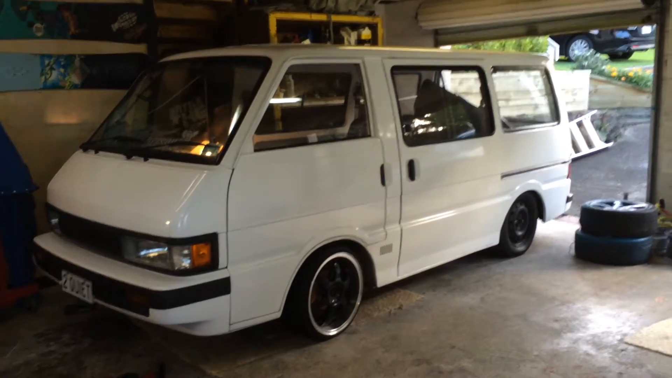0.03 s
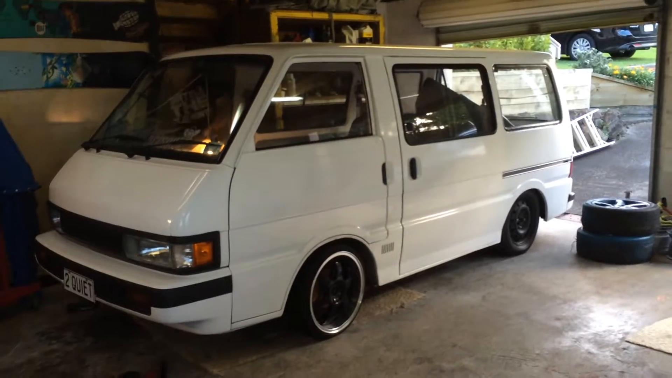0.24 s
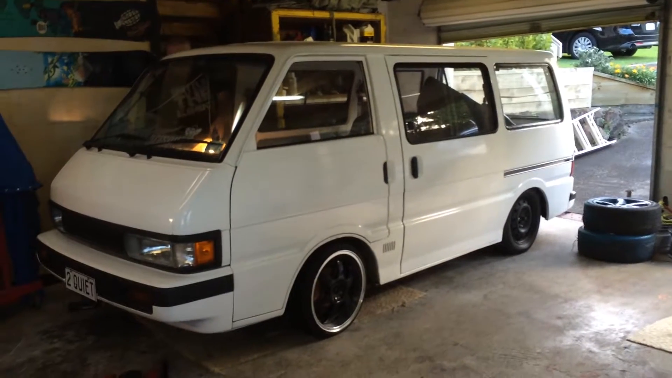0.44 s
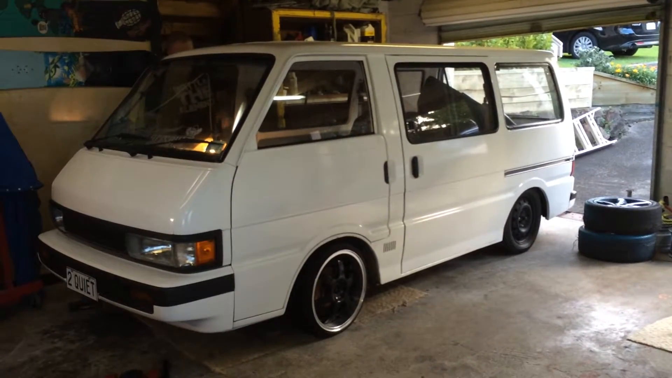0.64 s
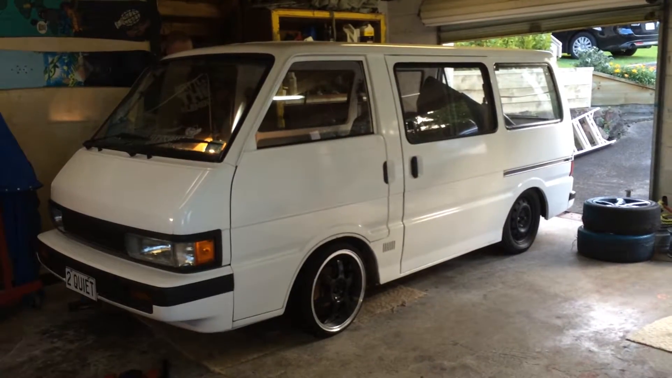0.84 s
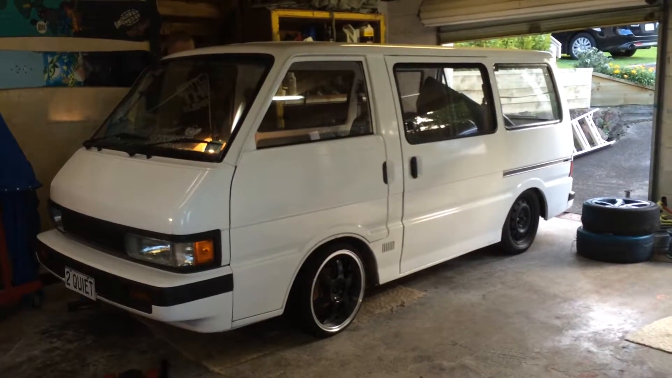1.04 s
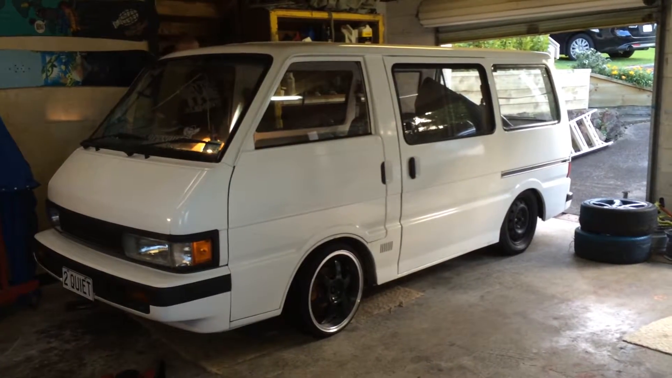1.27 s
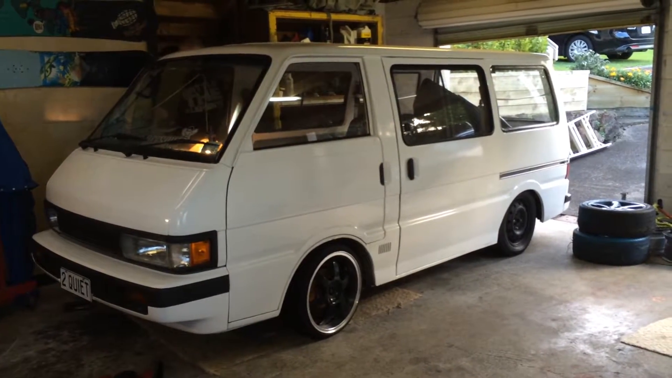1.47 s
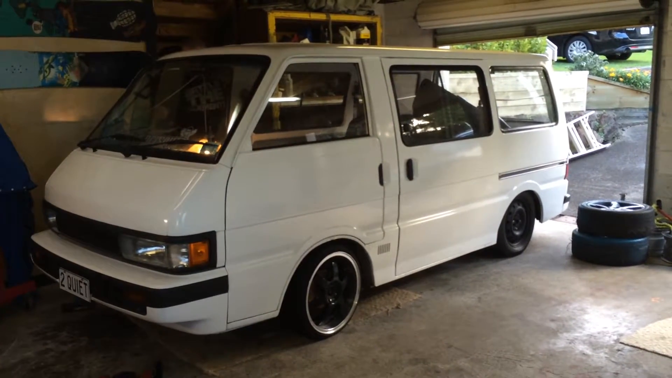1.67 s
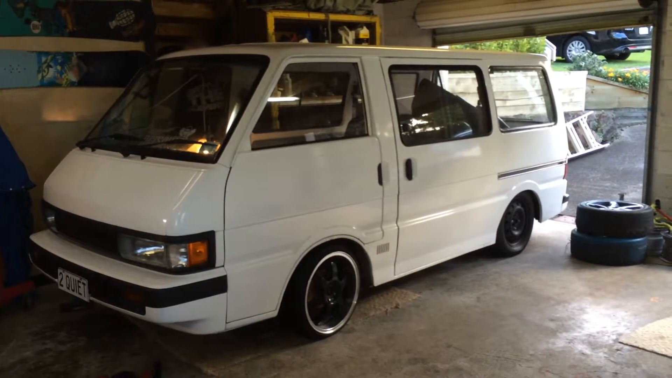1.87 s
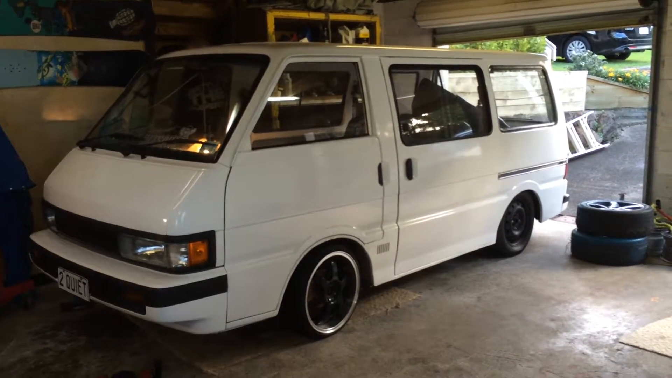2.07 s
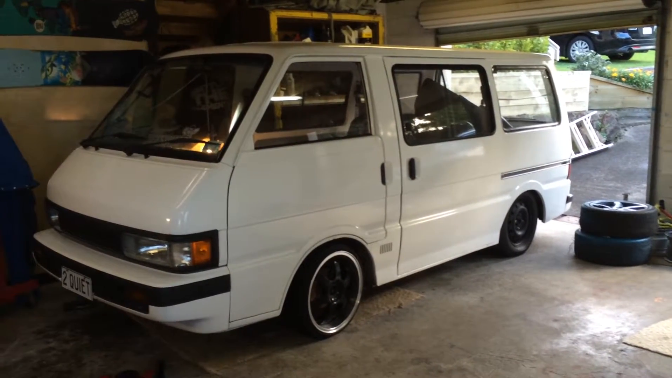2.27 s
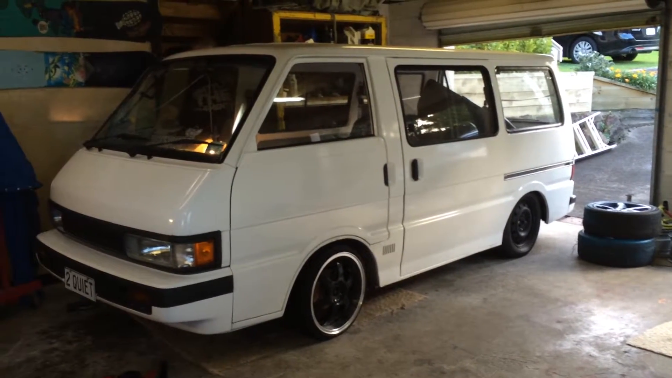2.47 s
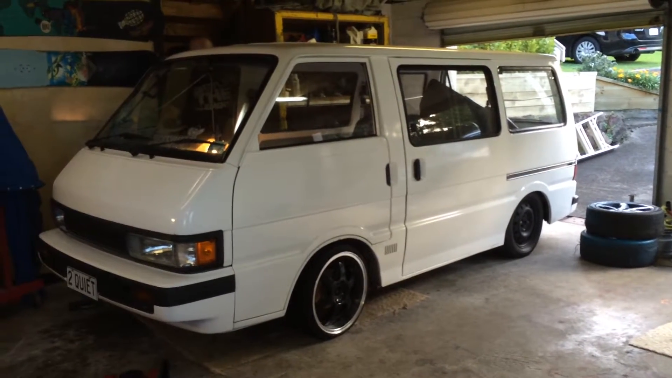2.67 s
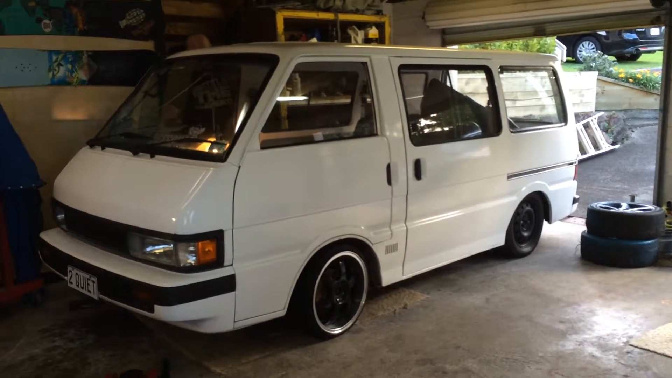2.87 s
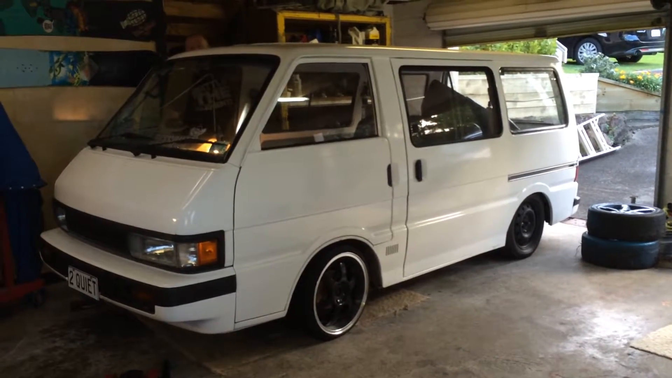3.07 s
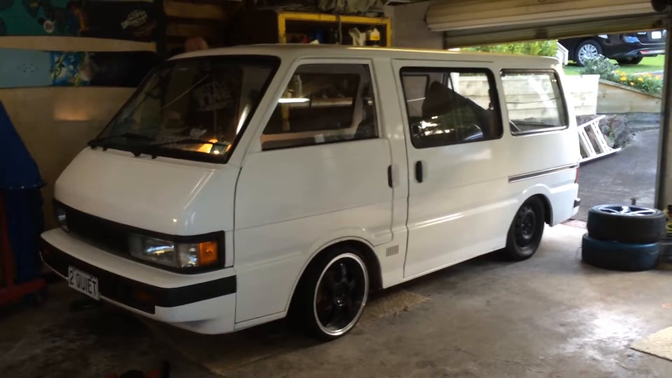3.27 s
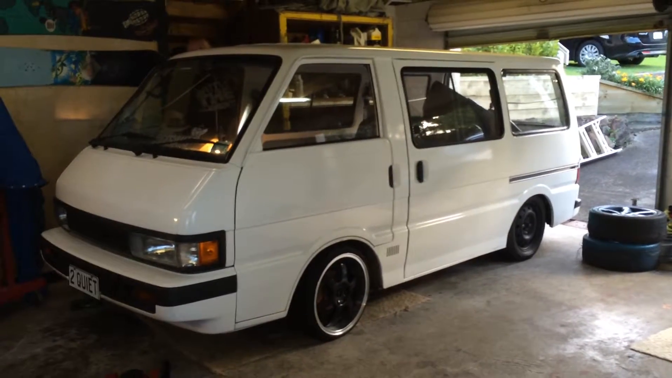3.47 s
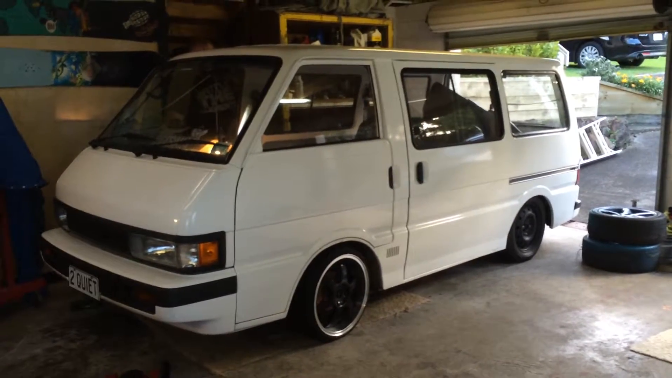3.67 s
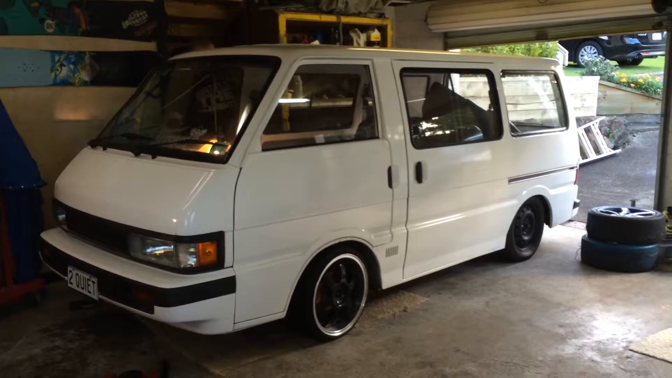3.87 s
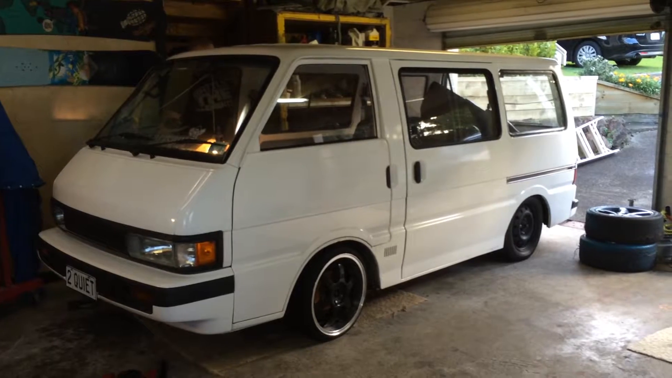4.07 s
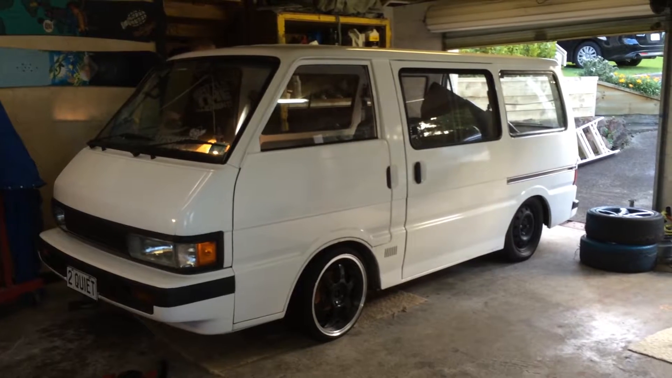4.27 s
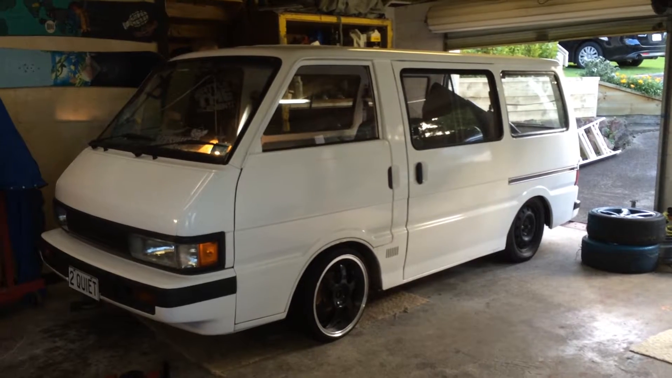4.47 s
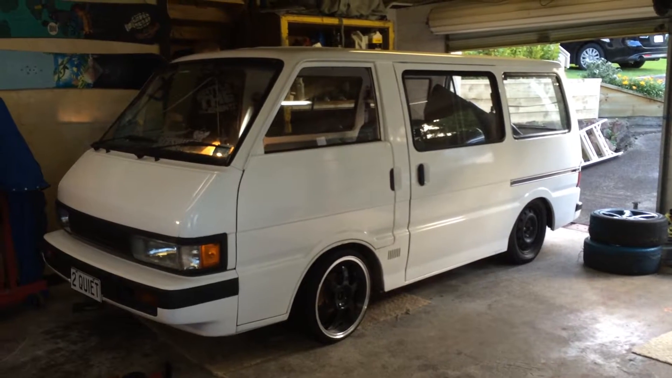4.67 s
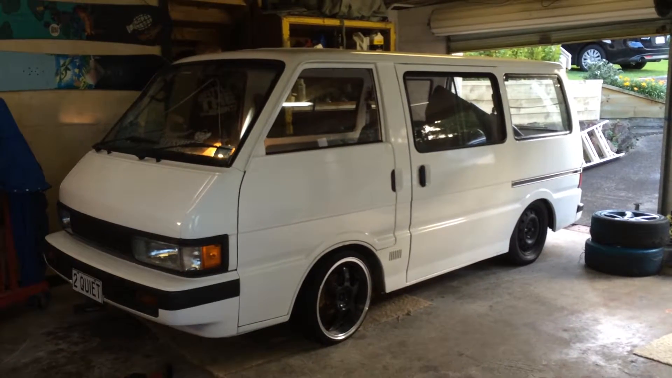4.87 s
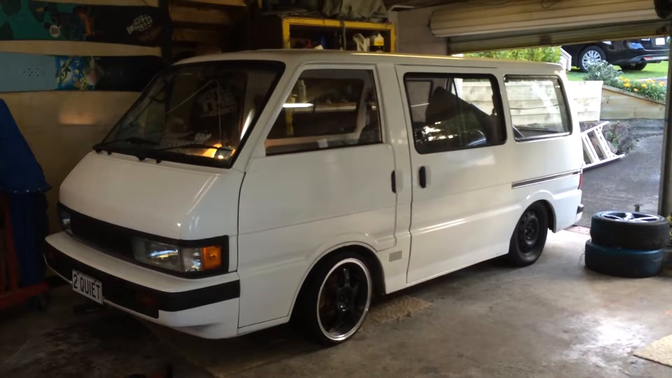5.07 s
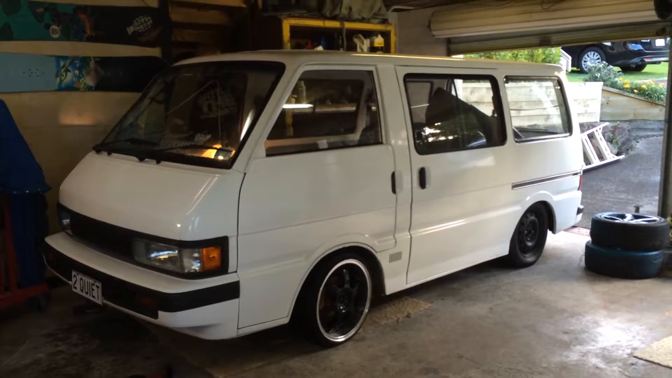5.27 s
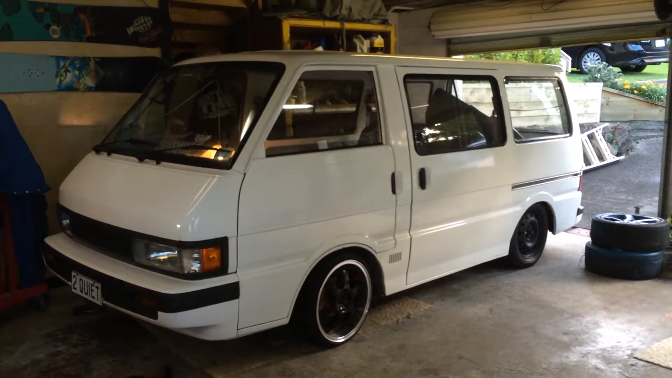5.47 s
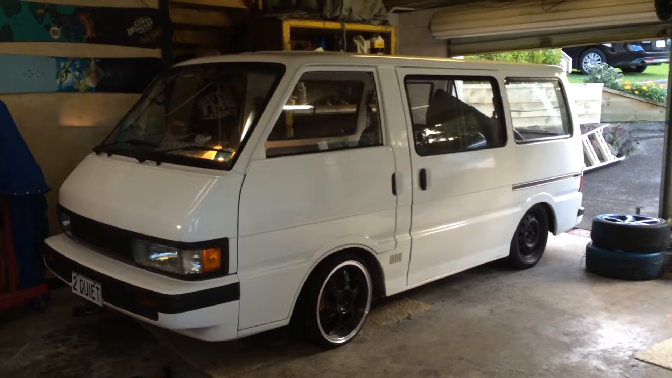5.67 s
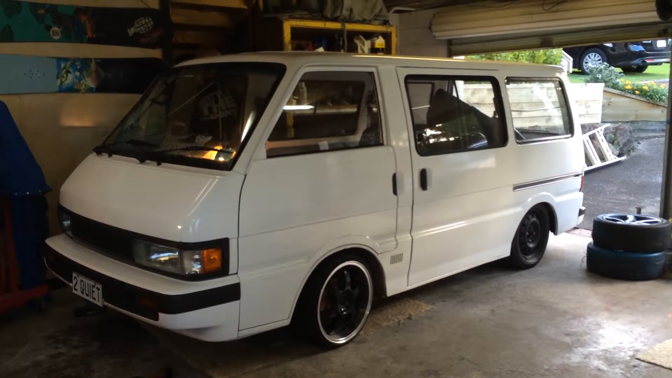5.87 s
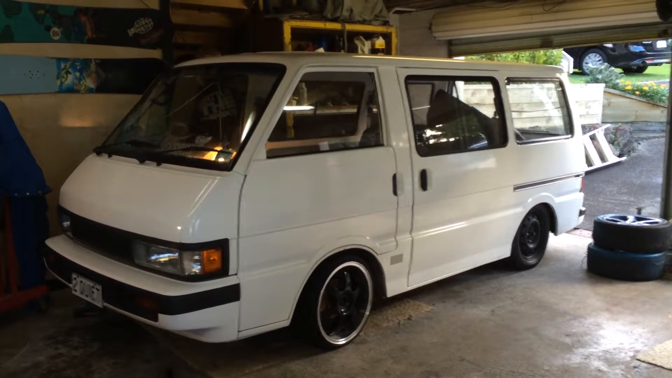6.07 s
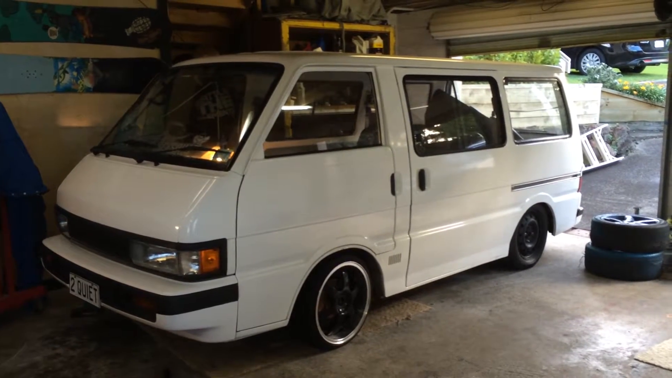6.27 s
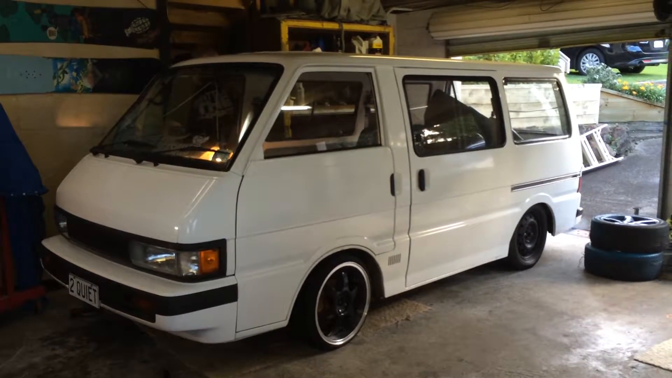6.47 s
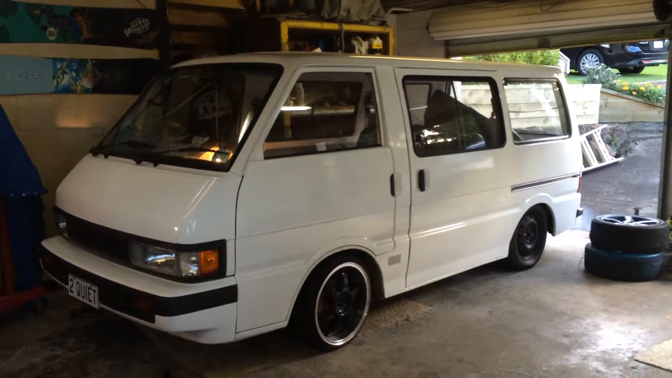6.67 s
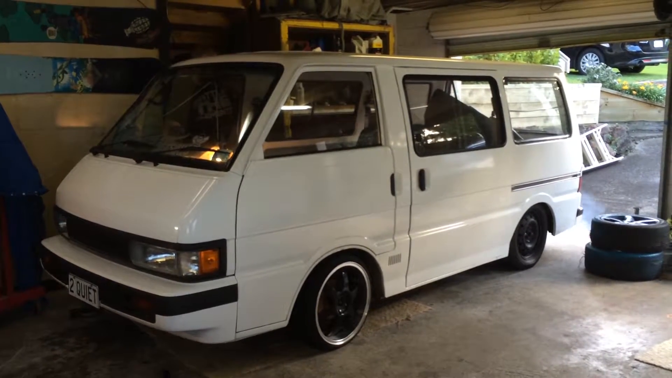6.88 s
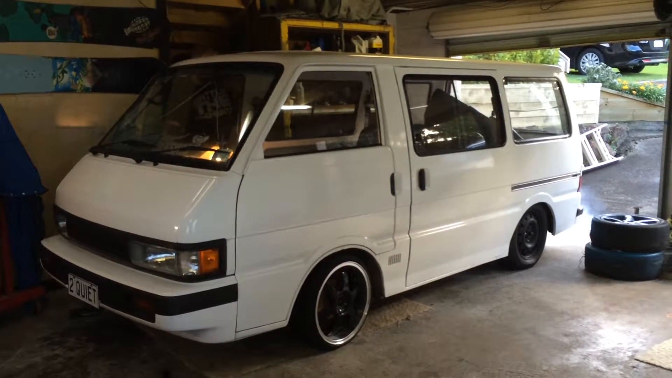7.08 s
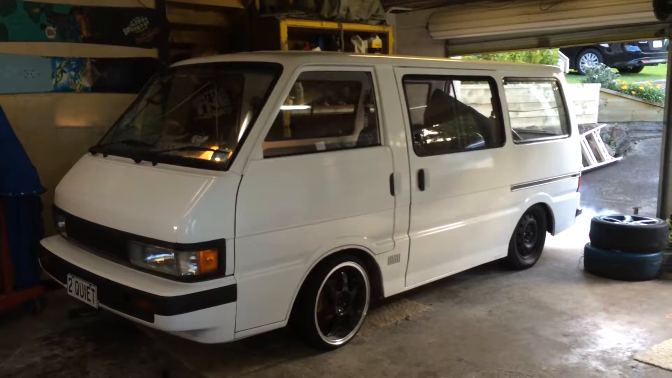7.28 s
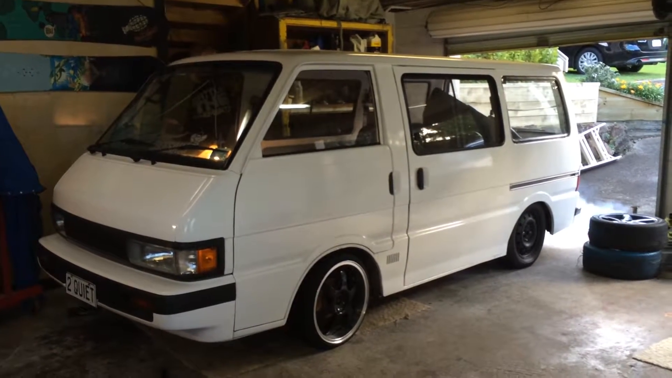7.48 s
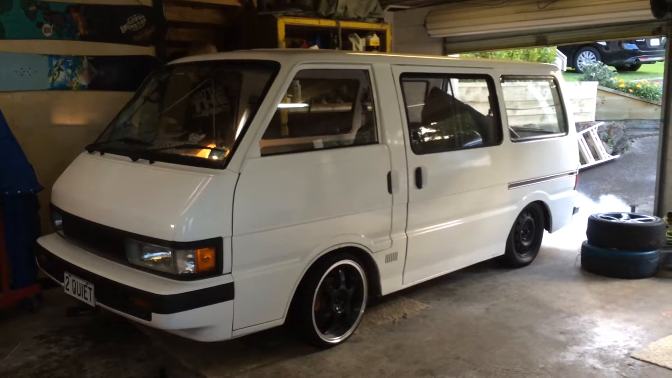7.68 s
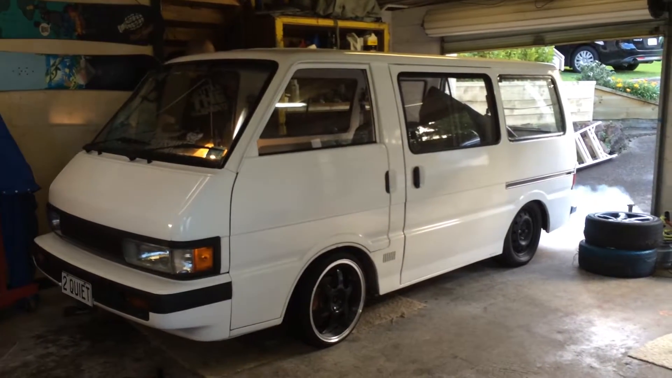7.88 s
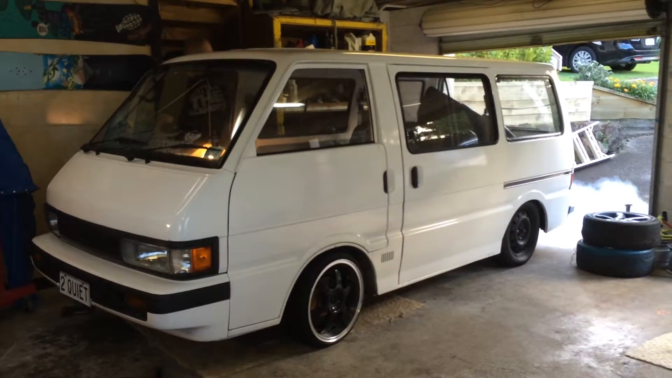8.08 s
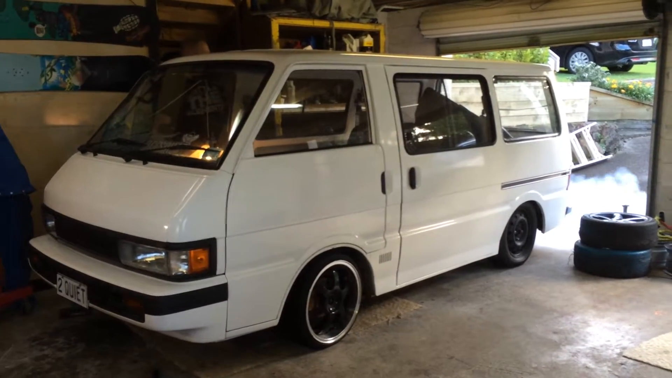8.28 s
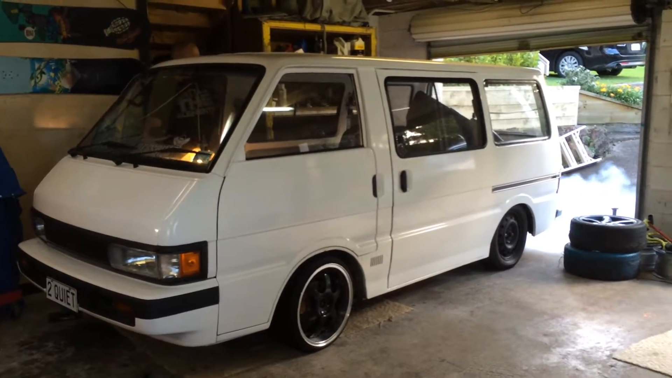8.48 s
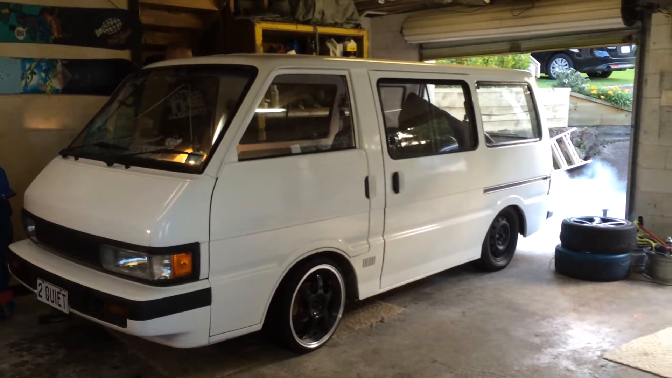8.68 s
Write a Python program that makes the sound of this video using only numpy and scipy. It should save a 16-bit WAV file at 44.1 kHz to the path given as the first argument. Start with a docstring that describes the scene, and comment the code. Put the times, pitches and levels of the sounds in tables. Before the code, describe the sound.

Faint birds chirp over soft outdoor air, heard from inside an open garage. A van's fuel pump switches on with a low hum. The starter engages with a clank and whines for about half a second, then the rotary engine catches with a flare and runs at a loud, lumpy fast idle, with a booming exhaust and metallic clatter. The microphone is near the front of the van.

```python
"""Birds sing over soft air and a low hum outside an open garage, where a van is about to start.
Its vane fuel pump spins up and hums; the starter's pinion strikes the flywheel and the gears whine.
The twin-rotor engine catches with a flare and settles to a loud, lumpy fast idle: six uneven firings
repeat with every rotor turn, exciting the resonances of the exhaust pipe and of the engine's metal."""
import sys
import numpy as np
from scipy import signal
from scipy.fft import rfft, irfft, next_fast_len
from scipy.io import wavfile
from scipy.ndimage import map_coordinates

SR = 44100
rng = np.random.default_rng(int(sys.argv[2]) if len(sys.argv) > 2 else 0)


def generate_wav(signal):
    """Clip the signal to [-1, 1] and save it as 16-bit WAV at the path in sys.argv[1]."""
    frames = np.transpose(np.atleast_2d(signal))
    scaled = np.clip(frames, -1, 1) * 32767
    pcm = np.round(scaled).astype(np.int16)
    wavfile.write(sys.argv[1], SR, pcm)


N = 384552
T = np.arange(N) / SR


def engine():
    """Periodic combustion: exhaust boom, metal clatter and gas rasp are all locked to the rotors."""
    # speed of the output shaft: (time [s], speed [turns/s])
    shaft_speed = [(6.2, 32.55), (6.4, 38.04), (6.6, 36.81), (6.8, 38.73), (7.1, 39.06), (7.35, 39.75),
                   (7.6, 38.97), (7.85, 38.16), (8.1, 36.69), (8.4, 35.82), (8.72, 33.69)]
    # how hard it burns as it catches, flares, stumbles and steadies: (time [s], level re idle [dB])
    effort = [(6.2, -4.5), (6.3, -1.5), (6.36, 2), (6.515, 4), (6.565, -1.5), (6.65, -4), (6.73, -1.1),
              (7.35, 1), (8.72, -0.34)]
    # six firings per rotor turn: (place [turns], relative rasp level [dB], relative clatter level [dB])
    firings = [(.02, -5.5, -1), (.11, -2, -6), (.42, -4.5, 0.5), (.53, -4.5, -4), (.82, -4.5, -1),
               (.94, -4, -4)]
    shaft_hz, effort_db = curve(shaft_speed), curve(effort)
    places, gas_db, knock_db = np.transpose(firings)
    rotor_hz = shaft_hz / 3
    turns = np.cumsum(rotor_hz) / SR
    turns -= np.interp(6.873, T, turns)  # a rotor turn begins at this time
    # uneven firings take over when the shaft runs slowly or the engine flares or stumbles
    ragged_db = -3.5 + 4 * np.maximum(35.8 - shaft_hz, 0) + 2.5 * np.abs(effort_db)
    treble = amp(-30 + 1.15 * effort_db) * (clatter(turns, places, knock_db) + rasp(turns, places, gas_db))
    bass = amp(effort_db) * exhaust(turns, rotor_hz, ragged_db)
    return fade_in(6.18, 0.0092) * bass + chugs() + fade_in(6.225, 0.014) * treble


def exhaust(turns, rotor_hz, ragged_db):
    """Forced resonance: harmonics of the rotor speed boom when they meet a mode of the pipe."""
    # harmonics of the exhaust tone: (order [x rotor speed], relative level [dB])
    orders = [(3, -31), (4, -15), (5, -18), (6, -16.5), (7, -10.5), (8, -11), (9, -17), (10, -2), (11, -8),
              (12, -6), (13, -24), (14, -1), (16, -34), (17, -14), (18, -2.5), (19, -6), (20, -13),
              (21, -28), (22, -7.5), (23, -11), (24, -11.5), (25, -6), (26, -13), (27, -15), (28, -9.5),
              (30, -10), (32, -32), (33, -13.5), (35, -21), (40, -19)]
    # orders that meet a resonance: (order [x rotor speed], centre [Hz], half width [Hz], level [dB])
    booms = [(15, 186.6, 7.8, -12.5), (18, 225.4, 10, -27), (25, 329, 4.5, -32.5), (30, 382, 19, -30.5),
             (33, 424, 10, -35.5)]
    # broad response of the pipe: (frequency [Hz], relative spectral density [dB])
    pipe_spectrum = [(15, -35), (28, -7), (60, -2), (110, 0.5), (200, -14.5), (300, 3.5), (420, -9),
                     (520, -30), (700, -26), (900, -21.5), (1300, -41.5)]
    beat = turns - .07
    lag = 0.22 * rng.standard_normal(size=64)  # the garage smears each beat: a phase lag per order
    tone = boom = 0
    for k, db in orders:
        swell = amp(db + 2 * drift(4.2))
        tone += swell * np.cos(2 * np.pi * (k * beat + lag[round(k)]) + 0.19 * drift(5))
    for k, centre_hz, half_width_hz, db in booms:
        detuning = np.abs((k * rotor_hz - centre_hz) / half_width_hz)
        response = amp(db) / np.sqrt(1 + detuning ** 5.5)
        angle = 2 * np.pi * (k * beat + lag[round(k)]) + 0.32 * drift(50)
        boom += response * np.sqrt(2) * np.cos(angle)
    throb = 1 + 0.14 * np.cos(2 * np.pi * (beat - .15))
    fired = np.clip(np.diff(np.floor(6 * turns), prepend=0), 0, 1)  # six impulses per turn
    pops = garage(fired * rng.standard_normal(N), wet_db=0.5)
    ragged = unit(unit(pipe(pops)) + amp(-1.5) * colour(pops, pipe_spectrum))
    gain = amp(-17)
    steady = gain * unit(tone) + throb * boom
    return (steady + gain * amp(ragged_db) * ragged) / np.hypot(1, amp(ragged_db))


def chugs():
    """Impulse response: one hard firing, a push of a few milliseconds, rings the pipe."""
    # hard firings as the engine catches and stumbles: (time [s], peak level [dB])
    hard_firings = [(6.191, -15), (6.238, -10.5), (6.284, -8), (6.322, -5.5), (6.597, -4), (8.452, -8),
                    (8.534, -8), (8.619, -6.5), (8.652, -11)]
    out = np.zeros(N)
    age = T[:SR // 4] / 0.00072
    blow = pipe(age * np.exp(-age))
    for s, db in hard_firings:
        add(out, s, amp(db) * blow / np.abs(blow).max())
    return out


def pipe(x):
    """Standing waves: modes of the exhaust pipe and the garage add with alternating sign."""
    # air resonances: (frequency [Hz], bandwidth [Hz], gain [dB])
    modes = [(89.4, 21, -5.5), (138.4, 8, -0.5), (192.1, 22.7, 1.5), (232.7, 15.6, 1.5), (297.3, 20, -5),
             (331.3, 6.8, 0), (389.7, 16, -7), (420.5, 31, -6), (446, 6.1, -13), (523, 10, -12.5),
             (612, 23, -19.5)]
    return sum((-1) ** k * amp(db) * ring(x, hz, width) for k, (hz, width, db) in enumerate(modes))


def clatter(turns, places, levels_db):
    """Impact excitation: each firing knocks the engine's metal, which rings in its modes."""
    # modes of the metal: (frequency [Hz], bandwidth [Hz], relative gain [dB])
    metal_modes = [(795, 9.7, 6.5), (1025, 37, 2.5), (1127, 12, 2), (1237, 44, -2), (1357, 18, 6),
                   (1584, 290, 0.5), (2635, 47, -4), (2790, 160, -6), (3450, 57, -9.5), (3950, 40, -5.5),
                   (6420, 530, -9), (8250, 90, -4)]
    # broad spectrum of the knocks: (frequency [Hz], relative spectral density [dB])
    knock_spectrum = [(260, -34), (450, 1), (488, 1.5), (529, -0.5), (653, -6.5), (799, -10), (911, -15.5),
                      (1040, -10.5), (1080, -8), (1360, -11.5), (1460, -16.5), (2120, -18.5), (2730, -14),
                      (3080, -19.5), (5000, -19.5), (6500, -60), (11000, -120)]
    # the same surfaces meet on every turn, so part of the clatter repeats
    surface = map_coordinates(rng.standard_normal(2048), [turns % 1 * 2048], order=3)
    roughness = 0.62 * unit(surface) + rng.standard_normal(N)
    knocks = roughness * firing_envelope(turns, places, levels_db, decay_turns=0.21, scatter_db=2)
    metal = unit(sum(amp(db) * ring(knocks, hz, width) for hz, width, db in metal_modes))
    return garage(amp(2.5) * colour(knocks, knock_spectrum), wet_db=0) + amp(-2.5) * metal


def rasp(turns, places, levels_db):
    """Flow noise: gas escapes in a hissing burst at each firing."""
    # escaping gas: (frequency [Hz], relative spectral density [dB])
    gas_spectrum = [(1500, -20), (3000, -3.5), (4500, -4.5), (5400, -1), (6800, 0), (9000, -1), (12000, -2),
                    (14500, -4), (16000, -12.5)]
    flow = rng.standard_normal(N)
    bursts = flow * firing_envelope(turns, places, levels_db, decay_turns=0.31, scatter_db=2.3)
    surge = amp(np.cos(2 * np.pi * (turns - .2)))  # follows the strongest firing of each turn
    return surge * colour(bursts, gas_spectrum)


def firing_envelope(turns, places, levels_db, decay_turns, scatter_db):
    """Incoherent bursts add in power: each leaps up and dies away over part of a rotor turn."""
    power = np.zeros(N)
    for place, db in zip(places, levels_db):
        turn, age = np.divmod(turns - place, 1)
        chance = rng.standard_normal(256)[turn.astype(int)]
        attack = 1 - np.exp(-age / 0.0024)
        power += amp(db + scatter_db * chance) ** 2 * np.exp(-age / decay_turns) * attack
    return unit(np.sqrt(power))


def starter():
    """Gear meshing: tooth contacts make a harmonic whine over a whirr that swells at each compression."""
    # cranking speed: (time [s], tooth contact rate [Hz])
    mesh_rate = [(5.72, 300), (5.79, 342), (5.87, 354), (5.92, 333), (5.96, 352), (6.0, 402), (6.05, 398),
                 (6.11, 426), (6.3, 440)]
    # harmonics of the whine: (order [x contact rate], relative level [dB])
    mesh_harmonics = [(1, -8), (2, -8), (3, -2), (4, 0), (5, -7), (8, -13)]
    # the motor's whirr and its hiss, each: (frequency [Hz], relative spectral density [dB])
    whirr_spectrum = [(18, -32), (30, -3), (165, -10), (252, -12.5), (392, -5.5), (570, -16.5),
                      (612, -10.5), (869, -8), (1390, -4.5), (2060, -11), (2790, -10.5), (3140, -13),
                      (8000, -28.5), (10400, -55), (17600, -120)]
    hiss_spectrum = [(2350, -28), (4000, -9.5), (6730, -4), (9960, -11), (13200, -11.5), (15000, -16.5)]
    engage_s, draw_s, release_s, compression_period_s = 5.698, 5.9, 6.24, 0.136
    teeth = np.cumsum(curve(mesh_rate) * (1 + .017 * drift(120))) / SR
    meshing = amp(-33.5) * fade_in(engage_s, .09) * (1 - fade_in(6.05, 0.28))
    whine = meshing * unit(sum(amp(db) * sine(k * teeth) for k, db in mesh_harmonics))
    inrush = np.exp(-np.maximum(T - engage_s - 0.044, 0) / 0.041)  # the first jolt of current
    load = amp(1.3 * np.cos(2 * np.pi * (T - 5.985) / compression_period_s))
    body = amp(-30) * load + amp(-27.5) * inrush * fade_in(engage_s, 0.041)
    intake = amp(-42.5) * fade_in(draw_s, 0.027)  # the chambers begin to draw air
    hiss = amp(-49) + intake + amp(-34.5) * inrush
    rattle = amp(0.76 * drift(250))
    whirr = rattle * (body * noise(whirr_spectrum) + hiss * noise(hiss_spectrum))
    bang = pinion_bang()
    engaged = fade_in(engage_s, 0.012) * (1 - fade_in(release_s, 0.18))
    return engaged * (whirr + garage(whine, wet_db=-1)) + garage(bang, wet_db=-10)


def pinion_bang():
    """Free vibration: the pinion slams into the flywheel and the housing rings in damped modes."""
    # blows of the pinion: (time [s], level [dB])
    blows = [(5.727, -25.5), (5.744, -26)]
    # modes of the housing: (frequency [Hz], relative level [dB], time to fall 60 dB [s])
    housing_modes = [(201.3, 1.5, 0.29), (262, -7, 0.23), (298.3, -3, 0.31), (612, 0, 0.24), (654, -7, 0.2),
                     (820, -3.5, 0.13), (1017, -5, 0.17), (1346, -3.5, 0.44), (1470, -19, 0.17),
                     (1900, -3, 0.094), (2620, 1, 0.095)]
    out, t = np.zeros(N), T[:SR // 2]
    for s, blow_db in blows:
        ringing = sum(amp(db - 60 * t / t60) * sine(hz * t) for hz, db, t60 in housing_modes)
        click = 0.8 * rng.standard_normal(len(t)) * np.exp(-t / 0.0018)
        add(out, s, amp(blow_db) * (ringing + click))
    return out


def scuffs():
    """Damped noise bands: a soft thud, two compression puffs, then the overrun starter's teeth scraping."""
    # bursts: (time [s], level [dB], centre [Hz], bandwidth [Hz], decay time [s])
    bursts = [(.03, -46, 60, 40, 0.083), (.04, -53, 190, 200, 0.15), (5.862, -33, 59.4, 39.2, 0.14),
              (6.01, -29, 153, 90, 0.2), (6.236, -24, 2860, 800, 0.041)]
    out, t = np.zeros(N), T[:SR // 2]
    for s, db, hz, width, decay in bursts:
        band = ring(rng.standard_normal(len(t)), hz, width)
        band = unit(ring(band, hz, 2 * width))
        envelope = np.minimum(t / (0.25 * decay), 1) * np.exp(-t / decay)
        add(out, s, amp(db) * band * envelope)
    return out


def fuel_pump():
    """Vane-passing tone: a four-vane pump churns until the line fills, then slows and gains overtones."""
    # other harmonics of the pump: (order [x pump speed], level re vane tone [dB])
    harmonics = [(3, -29), (5, -17), (6, -14.5), (7, -25), (8, -25), (9, -27), (11, -24), (15, -30),
                 (16, -33)]
    # churning fuel and the pump's hiss, each: (frequency [Hz], relative spectral density [dB])
    churn_spectrum = [(60, -11), (140, 4.5), (220, -1.5), (330, -11), (500, -23), (1500, -37.5)]
    hiss_spectrum = [(300, -10), (1500, 3), (3200, -5), (6000, -12.5), (10000, -8.5), (15000, -9.5)]
    on_s, spin_up_s, free_hz, loaded_hz = 3.45, .02, 56.8, 54.8
    full = fade_in(3.79, 0.077)
    spin = 1 - np.exp(-np.maximum(T - on_s, 0) / spin_up_s)
    speed_hz = spin * (free_hz + (loaded_hz - free_hz) * full)
    turns = np.cumsum(speed_hz * (1 + 0.0038 * drift(20))) / SR
    pressure = 0.18 + 0.89 * fade_in(3.65, 0.25)
    tone = np.sin(2 * np.pi * 4 * turns)
    for k, db in harmonics:
        tone += (pressure if k > 4 else 1) * amp(db + drift(6)) * sine(k * turns)
    hum = fade_in(on_s, 0.22) * amp(-40 - 5.5 * full) * np.sqrt(2) * tone
    hiss = fade_in(3.46, 0.019) * amp(-62) * noise(hiss_spectrum)
    churn = fade_in(on_s, spin_up_s) * amp(-49 - 10 * full) * noise(churn_spectrum)
    return hum + churn + hiss


def birds():
    """Frequency modulation: gliding, buzzing, nearly pure notes echo in through the door."""
    # the two pitch arches of a chirrup: (position [share of length], pitch [share of top])
    arches = [(0, .62), (.18, 1), (.25, .82), (.5, .57), (.58, .6), (.78, .8), (.86, .66), (1, .53)]
    # chirrups: (time [s], length [s], top pitch [Hz], first arch level [dB], second arch level [dB])
    chirrups = [(0.249, .115, 4920, -56, -47), (0.711, .17, 5310, -54.5, -56),
                (1.076, 0.14, 5470, -58.5, -53), (3.236, .12, 6000, -56.5, -60),
                (3.56, 0.11, 5850, -54, -56)]
    # falling slurs: (time [s], length [s], first pitch [Hz], level [dB])
    slurs = [(0.425, 0.047, 3400, -55.5), (1.439, 0.045, 3410, -52), (3.889, 0.079, 4360, -57.5)]
    # swelling trills: (time [s], length [s], first pitch [Hz], last pitch [Hz], level [dB], buzz [Hz])
    trills = [(.504, 0.17, 5500, 5100, -53.5, 283), (1.338, 0.079, 2990, 3550, -57.5, 240),
              (1.526, 0.14, 5560, 5450, -51, 228), (1.65, .063, 4900, 4330, -58, 400),
              (1.74, .16, 2900, 3900, -59.5, 400), (2.62, 0.14, 4300, 5300, -64.5, 380),
              (2.797, 0.26, 6300, 6500, -67.5, 600), (5.193, .17, 5900, 6380, -58, 520),
              (5.401, 0.37, 7400, 7700, -65, 368)]
    # level whistles: (time [s], length [s], pitch [Hz], level [dB])
    whistles = [(2.6, .1, 2400, -68), (3.596, .085, 3030, -59), (4.315, 0.14, 4630, -62),
                (4.41, 0.066, 3120, -55), (4.87, .031, 3670, -57)]
    out, buzz = np.zeros(N), drift(500)

    def sing(s, length, pitch, level, depth_hz=60):
        """A wavering tone and its faint octave; pitch [Hz] and level [dB] run over shares of its length."""
        u = np.linspace(0, 1, int(length * SR))
        hz = np.interp(u, *np.transpose(pitch)) + depth_hz * buzz[int(s * SR):][:len(u)]
        angle = 2 * np.pi * np.cumsum(hz) / SR
        gain = amp(np.interp(u, *np.transpose(level))) * signal.windows.tukey(len(u), .2)
        add(out, s, gain * (np.sin(angle) + amp(-24) * np.sin(2 * angle)))

    for s, length, top_hz, first_db, second_db in chirrups:
        level = [(0, first_db - 5), (.35, first_db), (.52, first_db - 6), (.64, second_db)]
        sing(s, length, np.multiply(arches, [1, top_hz]), level)
    for s, length, hz, db in slurs:
        sing(s, length, [(0, hz), (1, .72 * hz)], [(0, db)], depth_hz=88.5)
    for s, length, first_hz, last_hz, db, depth_hz in trills:
        sing(s, length, [(0, first_hz), (1, last_hz)], [(0, db - 1.5), (1, db + 1.5)], depth_hz)
    for s, length, hz, db in whistles:
        sing(s, length, [(0, hz)], [(0, db)])
    far_twitter = rng.uniform([0, .02, 2200, 2200], [5.5, .07, 4000, 4000], (45, 4))
    for s, length, first_hz, last_hz in far_twitter:
        sing(s, length, [(0, first_hz), (1, last_hz)], [(0, -70.5)])
    return garage(garage(out, wet_db=-2), wet_db=-5)


def outdoors():
    """Ambient noise with one soft swell, and a rising hum whose octave sweeps through a resonance."""
    # outdoor air: (frequency [Hz], relative spectral density [dB])
    air_spectrum = [(15, -44), (25, -6.5), (81, 0), (139, 0.5), (163, -7.5), (186, -1.5), (309, -8),
                    (354, -13), (427, -12), (604, -15.5), (927, -11), (1000, -11.5), (1240, -13),
                    (3440, -25.5), (15000, -46.5)]
    rise_at_s, first_hz, last_hz, resonance_hz = 2.8, 65.2, 69.6, 134.7
    hz = first_hz + (last_hz - first_hz) * fade_in(rise_at_s, 1.31)
    low_db = -70 + 14 * fade_in(rise_at_s, 0.64)
    octave_db = -59.5 + 8.5 * bell(2 * hz, resonance_hz, width=1.3)
    angle = 2 * np.pi * np.cumsum(hz * (1 + 0.0085 * drift(6.36))) / SR
    hum = np.sqrt(2) * (amp(low_db) * np.sin(angle) + amp(octave_db) * np.sin(2 * angle))
    breeze_db = 3.5 * bell(T, centre=1.69, width=0.25)
    return hum * amp(1.1 * drift(10)) + amp(-54.5 + breeze_db) * noise(air_spectrum)


def garage(x, wet_db):
    """Reverberation: dense reflections decay exponentially, lasting longest in the midrange."""
    # decay of the garage: (frequency [Hz], time to fall 60 dB [s])
    reverberation_times = [(100, 0.22), (1000, 0.38), (5000, 0.33), (15000, 0.29)]
    hz, t, spectra = signal.stft(rng.standard_normal(SR // 2), SR, nperseg=256)
    decay = amp(-60 * t / at_frequency(reverberation_times, hz)[:, None])
    tail = signal.istft(spectra * decay, SR, nperseg=256)[1]
    echo = signal.fftconvolve(x, tail / np.linalg.norm(tail))[:N]
    return (x + amp(wet_db) * echo) / np.hypot(1, amp(wet_db))


def amp(db):
    """Decibels to amplitude ratio."""
    return 10 ** (np.asarray(db) / 20)


def unit(x):
    """Normalises to rms 1."""
    return x / np.sqrt(np.mean(x ** 2) + 1e-20)


def curve(points):
    """Linear interpolation of (time [s], value) points."""
    return np.interp(T, *np.transpose(points))


def at_frequency(points, hz):
    """Interpolation of (frequency [Hz], value) points over log frequency."""
    f, value = np.transpose(points)
    return np.interp(np.log(hz + 1), np.log(f), value)


def fade_in(s, length):
    """A linear ramp from 0 to 1 that starts at time s."""
    return np.clip((T - s) / length, 0, 1)


def bell(x, centre, width):
    """A Gaussian hump of height 1."""
    return np.exp(-((x - centre) / width) ** 2)


def sine(cycles):
    """A sinusoid with a random starting phase."""
    return np.sin(2 * np.pi * (cycles + rng.random()))


def colour(x, spectrum):
    """Linear filtering: weights x by a spectrum, at rms 1."""
    size = next_fast_len(N + 4096)
    gain = amp(at_frequency(spectrum, np.fft.rfftfreq(size, 1 / SR)))
    return unit(irfft(rfft(x, size) * gain, size)[:N])


def noise(spectrum):
    """Gaussian noise with the given spectrum."""
    return colour(rng.standard_normal(N), spectrum)


def drift(per_s):
    """Smooth random modulation of rms 1."""
    position = np.clip(T * per_s, 0, 4000)
    return unit(map_coordinates(rng.standard_normal(4096), [position], order=2))


def ring(x, hz, width):
    """A damped resonator of gain 1 and the given bandwidth [Hz]."""
    r = np.exp(-np.pi * width / SR)
    return 2 * signal.lfilter([1 - r], [1, -r * np.exp(2j * np.pi * hz / SR)], x).real


def add(mix, s, sound):
    """Superposes a sound on the mix at time s."""
    part = mix[round(s * SR):][:len(sound)]
    part += sound[:len(part)]


def scene():
    """Superposition: all sources add in one channel, as heard from the front of the van."""
    return (outdoors() + birds() + scuffs() + fuel_pump() + starter() + engine())[None]


def record(dry):
    """Soft saturation rounds the loudest peaks; a low-pass filter then limits the band."""
    ceiling, cutoff_hz = .71, 15400
    limited = dry / (1 + (dry / ceiling) ** 6) ** (1 / 6)
    low_pass = signal.firwin(1023, cutoff_hz, window=("kaiser", 9), fs=SR)
    return signal.oaconvolve(limited, low_pass[None], "same")


dry = scene()
out = record(dry)
generate_wav(out)
```